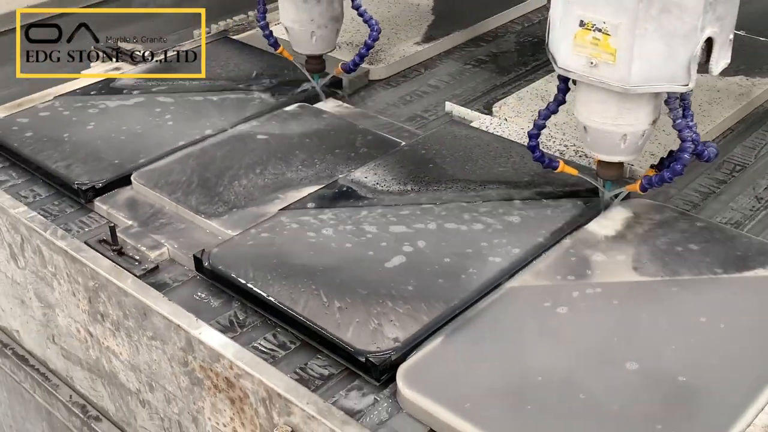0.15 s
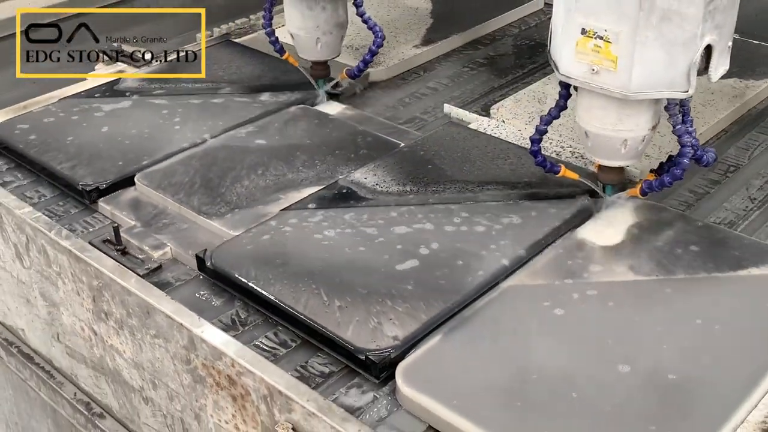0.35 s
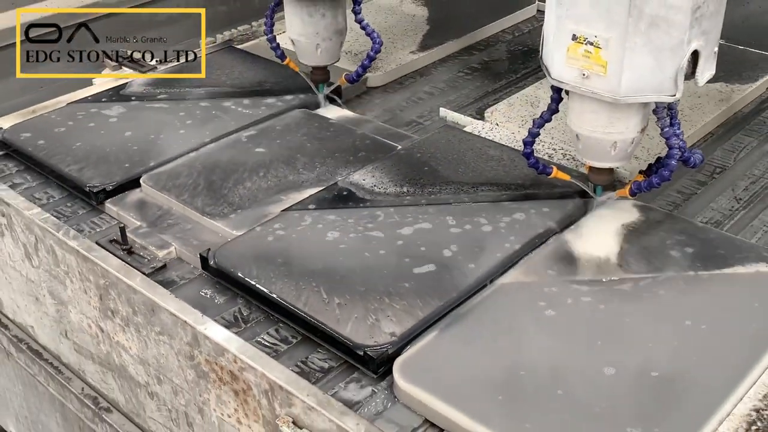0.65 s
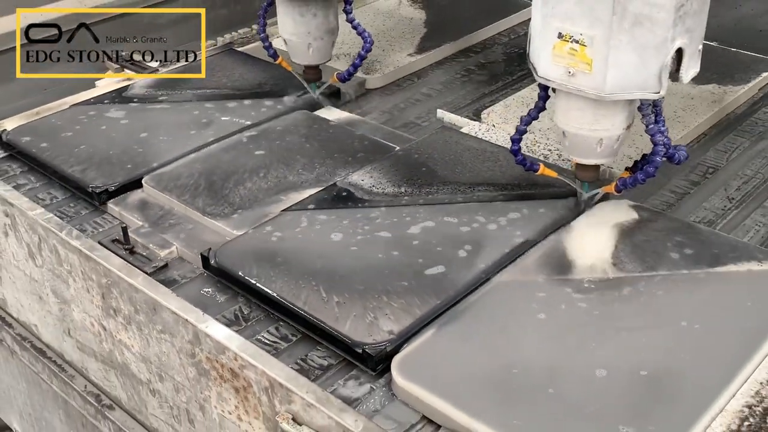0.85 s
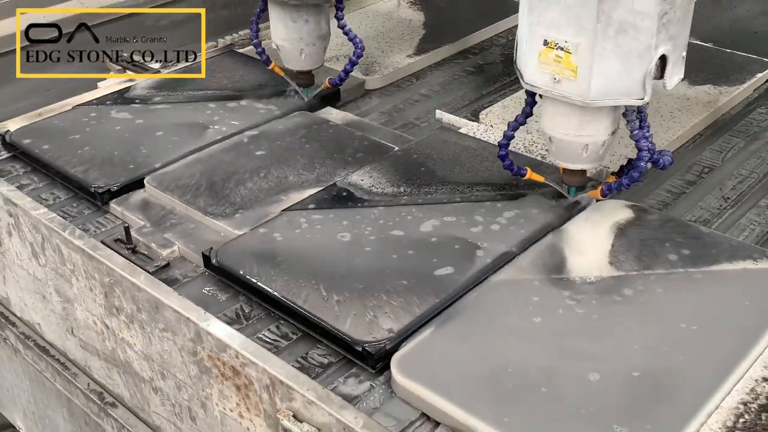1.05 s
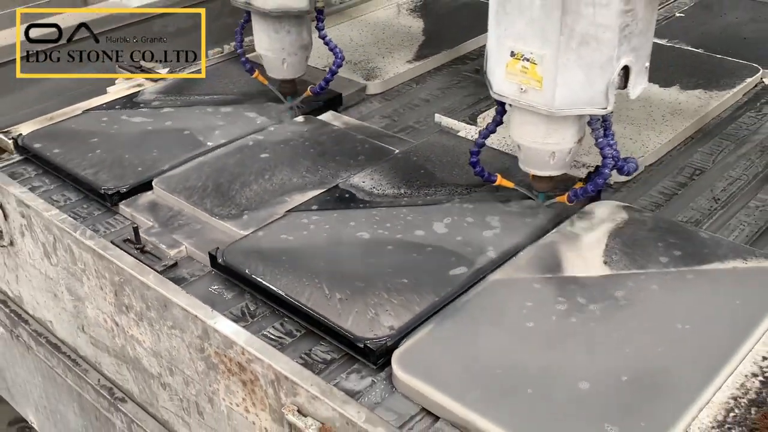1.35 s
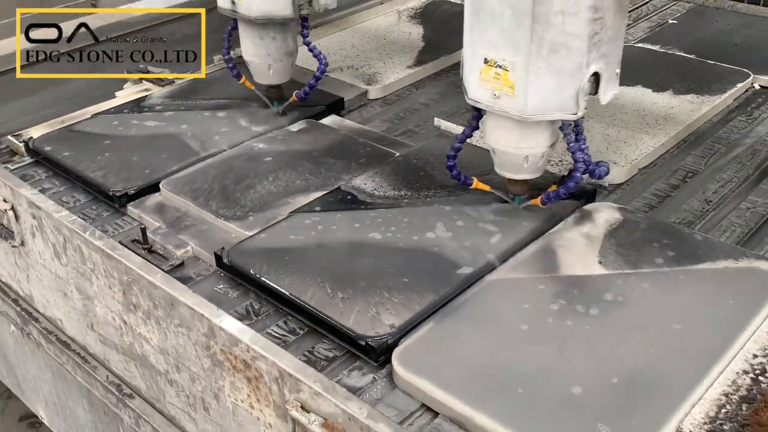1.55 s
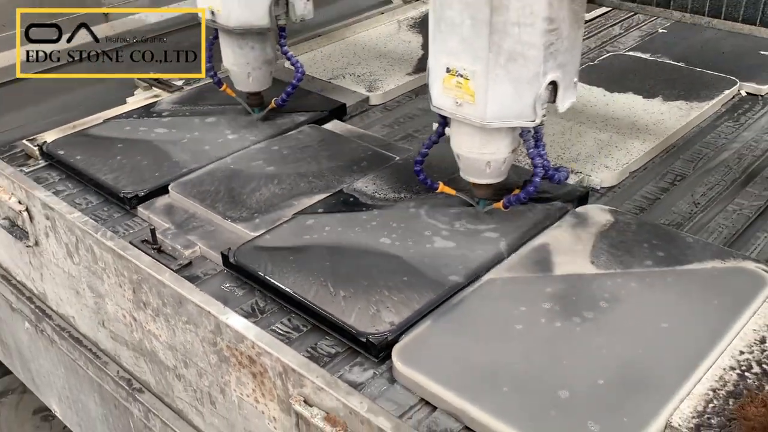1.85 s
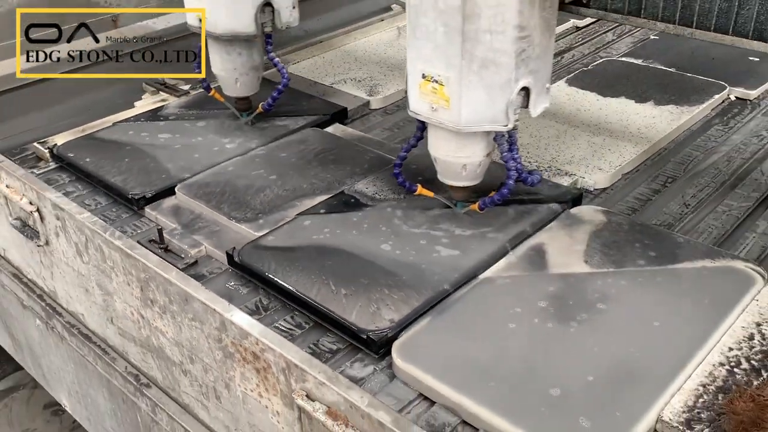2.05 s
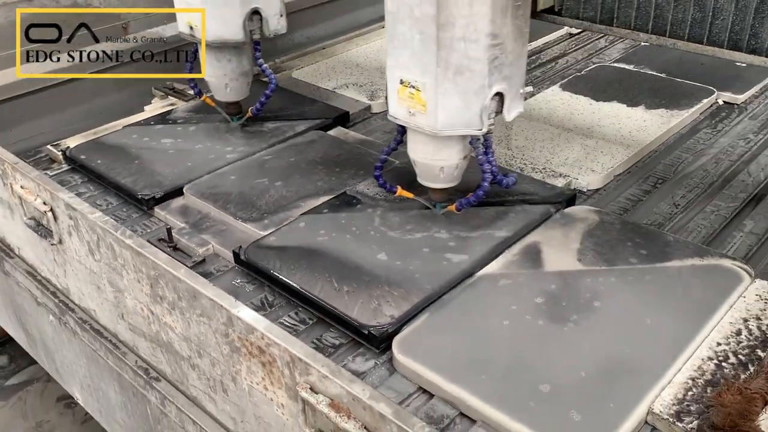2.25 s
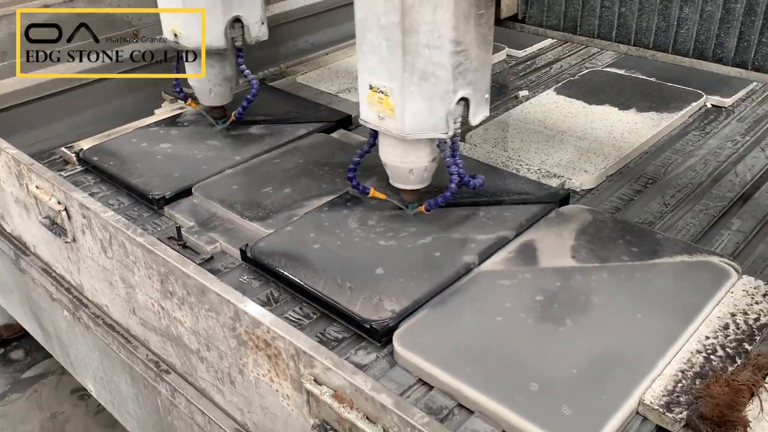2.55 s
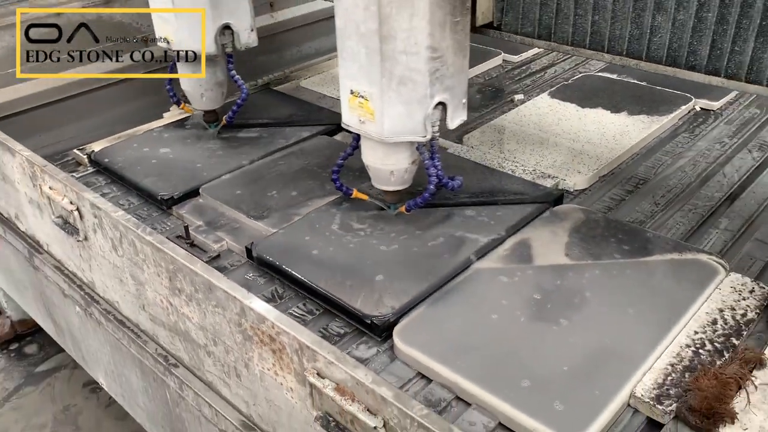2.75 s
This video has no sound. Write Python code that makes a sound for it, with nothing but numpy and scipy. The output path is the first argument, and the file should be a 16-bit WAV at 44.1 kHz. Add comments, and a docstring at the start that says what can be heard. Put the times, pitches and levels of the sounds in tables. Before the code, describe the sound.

Spinning stone grinder skims, lifts briefly, then settles into a steady droning whine with wet hiss

```python
"""A stone router grinds the edge of a wet slab in a rumbling workshop, heard by two close microphones.
At first the tool skims and chatters: its spindle, at about 400 turns a second, drives a whine of many tones.
Then it lifts off and runs free for a moment, with brief squeals as thin tones and tiny ticks as falling chirps.
Last it bites: water splashes louder, the speed sags a little, the whine steadies and the hiss brightens.
Splash, hiss and rumble are coloured noise; the hiss pulses with every turn."""
import sys
import numpy as np
from scipy import signal
from scipy.fft import rfft, irfft
from scipy.io import wavfile

SR = 44100
rng = np.random.default_rng(int(sys.argv[2]) if len(sys.argv) > 2 else 0)


def pcm_store(signal):
    """Save signal as 16-bit PCM."""
    levels = np.round(np.clip(np.atleast_2d(signal), -1, 1) * 32767)
    wavfile.write(sys.argv[1], SR, levels.astype(np.int16).T)


N = 127449
T = np.arange(N) / SR  # time of every sample, s
HZ = np.fft.rfftfreq(N, 1 / SR)  # frequencies of a spectrum
# half of a left-right difference for each side: left, right [factor]
SIDES = np.array([[.5], [-.5]])


def amp(db):
    """Turns decibels into a gain."""
    return 10 ** (np.asarray(db) / 20)


def curve(points):
    """Joins (time, value) points by straight lines, giving a value at every sample."""
    return np.interp(T, *np.transpose(points))


def read(points):
    """Joins (frequency, value) points along a logarithmic pitch scale."""
    hz, value = np.transpose(points)
    return np.interp(np.log(HZ + 1), np.log(hz), value)


def bell(centre, width):
    """A smooth swell from 0 to 1 and back."""
    return np.exp(-((T - centre) / width) ** 2)


def wander(rate_hz, size=2048):
    """Smooth random complex wandering of average power 1, mostly slower than the given rate."""
    span = 2 * T[-1]  # twice the scene, so the repeating pattern does not return
    f = np.fft.fftfreq(size, span / size)
    draws = rng.standard_normal(size) + 1j * rng.standard_normal(size)
    z = np.fft.ifft(draws / (1 + (f / rate_hz) ** 2))
    return np.interp(T, np.linspace(0, span, size), z / np.sqrt(np.mean(abs(z) ** 2)))


def by_load(load, skimming, biting):
    """Blends a skimming value (load 0) into a biting one (load 1)."""
    return skimming + (biting - skimming) * load


# how far the left microphone's wave is ahead: (frequency [Hz], lead [radians])
LEFT_LEAD = [(0, 0), (3800, 6.3), (8000, 17.2), (10200, 12.6), (15000, 3.1)]


def lead(hz):
    """Phase lead of the left microphone at a given pitch, in radians."""
    return np.interp(hz, *np.transpose(LEFT_LEAD))


# how alike the noise is at the two microphones: (frequency [Hz], likeness [0-1])
LIKENESS = [(60, 0.97), (300, 0.99), (800, 0.86), (2000, 0.67), (3300, 0.057), (5500, 0.17), (8500, 0.5),
            (14000, 1)]


def noise(spectrum):
    """Coloured noise at two microphones: they share part of it, and the left one leads."""
    shared, separate = rfft(rng.standard_normal((2, N)))
    same = read(LIKENESS)
    left = shared * np.exp(1j * lead(HZ))
    right = same * shared + np.sqrt(1 - same ** 2) * separate
    return irfft(np.array([left, right]) * amp(read(spectrum)) * np.sqrt(SR / 2), N)


# colour of the workshop rumble, before its level curve: (frequency [Hz], density [dB per Hz])
SHOP_COLOUR = [(25, -88), (36, -73), (52, -59), (82, -59.5), (130, -64.5), (300, -69.5), (700, -83.5),
               (2400, -73), (3300, -79.5), (5000, -75.5), (15500, -87)]
# rise and fall of the rumble: (time [s], level [dB])
SHOP_LEVEL = [(.6, -2), (.8, 1.5), (1.4, 1), (2.0, -2.5)]


def workshop():
    """The rumble of the workshop: steady coloured noise with a slow level curve."""
    return noise(SHOP_COLOUR) * amp(curve(SHOP_LEVEL))


# colour of the splashing, before its level curve: (frequency [Hz], density [dB per Hz])
SPLASH_COLOUR = [(40, -93), (110, -66.5), (200, -64), (480, -62.5), (780, -66), (940, -80), (1300, -63),
                 (1900, -67), (3000, -77), (6000, -81)]
# rise and fall of the splashing: (time [s], level [dB])
SPLASH_LEVEL = [(0, -6.5), (.6, -10), (.9, -10), (1.05, 1), (1.35, -1.5), (2.89, -1)]


def water(flicker_db=3.0):
    """Cooling water splashing over the slab: coloured noise whose level flickers at random."""
    flicker = flicker_db * wander(rate_hz=16).real
    return noise(SPLASH_COLOUR) * amp(curve(SPLASH_LEVEL) + flicker)


# first and last points of the run of ticks: (time [s], pitch at the middle [Hz], level [dB])
TICKS = [(.453, 8950, -42), (1.01, 9700, -35)]
TICK_GAP_S, TICK_S, TICK_FALL_HZ_PER_S = .0458, .0025, 50000


def ticks():
    """Evenly spaced tiny chirps: each falls in pitch while swelling and fading."""
    times, pitches, levels = np.transpose(TICKS)
    out = np.zeros((2, N))
    for at in np.arange(times[0], times[-1], TICK_GAP_S):
        t = T - at
        hz = np.interp(at, times, pitches)
        cycles = hz * t - TICK_FALL_HZ_PER_S * t ** 2 / 2
        chirp = np.sin(2 * np.pi * cycles + SIDES * lead(hz))
        swell = np.exp(-(t / TICK_S) ** 2 / 2)
        out += amp(np.interp(at, times, levels)) * swell * chirp
    return out


# short squeals: (start [s], length [s], pitch [Hz], level [dB])
SQUEALS = [(0.427, 0.02, 3980, -34), (0.454, .2, 10160, -50), (0.663, .007, 5800, -29.5)]


def squeals():
    """Brief thin tones as the tool lifts off, runs free and touches down; each swells and fades."""
    out = np.zeros((2, N))
    for start, length, hz, db in SQUEALS:
        progress = np.clip((T - start) / length, 0, 1)
        swell = np.sqrt(2 * abs(np.sin(np.pi * progress)))
        out += amp(db) * swell * np.sin(2 * np.pi * hz * T + SIDES * lead(hz))
    return out


FREE_HZ, LOADED_HZ = 399.9, 398.45  # turns a second at load 0 and load 1
SKIM_JITTER_HZ, BITE_JITTER_HZ = 0.695, 0.48  # multiply the random speed wander


def spindle(load):
    """Turns made so far by the spindle: under load it slows and its speed wanders less."""
    jitter = by_load(load, SKIM_JITTER_HZ, BITE_JITTER_HZ) * wander(rate_hz=12.3).real
    return np.cumsum(by_load(load, FREE_HZ, LOADED_HZ) + jitter) / SR


# colours of the hiss while skimming, while biting, and in the flare as the tool digs in,
# before load, contact and pulsing: (frequency [Hz], density [dB per Hz])
SKIM_HISS = [(400, -110), (720, -62.5), (950, -75.5), (1300, -74), (2500, -85), (4500, -76), (7400, -67),
             (8500, -70.5), (10400, -72.5), (11500, -89), (14500, -80.5)]
BITE_HISS = [(700, -92), (1800, -77), (3100, -81), (4200, -71.5), (5000, -74), (6200, -66.5), (8400, -65.3),
             (10400, -64.6), (11500, -68.5), (13000, -71.5), (15500, -74)]
ENTRY_HISS = [(7500, -90), (9800, -62), (11500, -82)]
ENTRY_S, ENTRY_WIDTH_S = 1.39, 0.23  # when the flare peaks, and its width
PER_TURN, GRIT_DB = 0.15, 2.5  # depth of the pulse each turn; size of the random roughness


def grinding(turns, load, contact):
    """Grit and flung water hiss: noise pulsing with every turn, brighter under load."""
    hiss = np.sqrt(1 - load) * noise(SKIM_HISS)
    hiss += np.sqrt(load) * noise(BITE_HISS)
    hiss += bell(ENTRY_S, ENTRY_WIDTH_S) * noise(ENTRY_HISS)
    pulse = 1 + PER_TURN * np.cos(2 * np.pi * turns)
    roughness = amp(GRIT_DB * wander(rate_hz=20).real)
    return hiss * contact * pulse * roughness


# tones from the sixth multiple of the turning speed upward, at load 0 and load 1,
# before swells and contact: level [dB], one per multiple
SKIM_DB = [-48, -43, -51, -53, -51, -48, -51, -51, -48, -42.5, -42.5, -48, -45, -42, -48]
BITE_DB = [-45, -47, -51, -49, -47, -44, -46.5, -50, -43.5, -45, -46, -42, -42, -42.5, -41, -50, -48, -42.5,
           -46, -42, -37.5, -43, -45, -54, -54, -54, -54, -45, -47, -45]
SKIM_TOP_DB = -59.5  # each tone above the end of the skimming list
# slow swells of single tones as the tool moves past:
# (multiple of turning speed, centre time [s], width [s], gain [dB])
SWELLS = [(6, 2.55, .3, 8), (7, 2.2, .55, 10), (8, 2.7, .45, 9), (9, 2.85, .55, 10), (10, 2.55, .17, 6),
          (11, 1.87, .3, 8), (14, 2.05, .25, 7), (15, 1.7, .22, 7), (16, 1.15, .14, 6), (17, 2.75, .2, 7)]
CHATTER_HZ, DRIFT_HZ = 24, 2.5  # how fast the flutter and the slow drift wander
SKIM_CHATTER, BITE_CHATTER, DRIFT = 1, 0.45, 0.5  # depths


def whine(turns, load, contact):
    """Upper tones of the rubbing tool: they flutter with chatter and swell as tool and microphones move."""
    out = np.zeros((2, N))
    chatter = by_load(load, SKIM_CHATTER, BITE_CHATTER)
    skim_levels = SKIM_DB + [SKIM_TOP_DB] * len(BITE_DB)
    for k, (skim, bite) in enumerate(zip(skim_levels, BITE_DB), start=6):
        swell_db = sum(db * bell(at, width) for multiple, at, width, db in SWELLS if multiple == k)
        direct = np.exp(1j * SIDES * lead(k * LOADED_HZ))
        # each microphone drifts on its own
        paths = direct + DRIFT * np.array([wander(DRIFT_HZ), wander(DRIFT_HZ)])
        flutter = 1 + chatter * wander(CHATTER_HZ)
        tone = np.exp(2j * np.pi * (k * turns + rng.random())) * flutter
        out += amp(by_load(load, skim, bite) + swell_db) * (paths * tone).real
    # keeps the average power the same whatever the flutter and drift
    return out * contact * np.sqrt(2 / (1 + chatter ** 2) / (1 + DRIFT ** 2))


# the five lowest tones, at one to five times the turning speed: (time [s], level [dB])
TONE_1 = [(0.02, -35), (0.17, -29), (0.3, -43), (0.37, -30.5), (0.46, -35), (0.55, -31.5), (1.19, -32.5),
          (1.26, -43), (1.42, -29), (2.04, -30), (2.18, -26.5), (2.62, -25), (2.88, -27.9)]
TONE_2 = [(.02, -28), (.07, -35), (.11, -26), (.2, -42), (.3, -40), (.34, -28), (.39, -37), (.43, -26),
          (.47, -39), (.66, -40), (.69, -28.5), (.725, -41), (.77, -27), (.86, -23), (.97, -40),
          (1.09, -30), (1.15, -38), (1.24, -23), (1.43, -21.5), (1.8, -26.5), (2.27, -26), (2.62, -21.7),
          (2.88, -26.5)]
TONE_3 = [(0, -32.5), (.06, -31), (.17, -44), (.29, -43), (.355, -32), (.4, -43), (1.05, -43), (1.15, -29),
          (1.23, -40), (1.7, -49), (2.89, -43)]
TONE_4 = [(.33, -41), (.5, -62), (.9, -49), (1.17, -37), (1.42, -48), (1.85, -37), (2.42, -35.5),
          (2.89, -45)]
TONE_5 = [(.02, -34.5), (.13, -53), (.21, -37), (.3, -54), (.38, -39.5), (.5, -62), (.72, -45), (1.25, -46),
          (1.34, -36.5), (1.55, -43), (1.75, -34), (2.04, -30), (2.63, -39), (2.88, -33)]
# where each of the five sits between the moving microphones, one list per tone:
# (time [s], left lead [turns of its own wave])
TONE_LEADS = [
    [(.27, .66), (.38, 0.95), (.46, 0.59), (.9, 0.64), (1.4, 0.045), (2.2, 0.11)],
    [(.8, 0.058), (1.2, 0.13)],
    [(0, 0.14)],
    [(1.7, -0.19), (2.2, -0.83), (2.7, -0.36)],
    [(1.1, -0.24), (1.28, 0.27), (1.52, -0.23), (1.72, 0.34), (2.5, 0.67)],
]
# loudness difference of each of the five: left minus right [dB]
TONE_PANS = [1.8, -2.3, 1.5, -2.5, -3.5]
LOW_SKIM_CHATTER, LOW_BITE_CHATTER = .38, .14  # flutter depths at load 0 and load 1


def drone(turns, load):
    """The strong lowest tones, rung in the slab once a turn; their flutter calms under load."""
    out = np.zeros((2, N))
    chatter = by_load(load, LOW_SKIM_CHATTER, LOW_BITE_CHATTER)
    levels = [TONE_1, TONE_2, TONE_3, TONE_4, TONE_5]
    for k, (level, left_lead, pan_db) in enumerate(zip(levels, TONE_LEADS, TONE_PANS), start=1):
        phase = k * turns + rng.random() + SIDES * curve(left_lead)
        flutter = 1 + chatter * wander(CHATTER_HZ)
        tone = np.sqrt(2) * (np.exp(2j * np.pi * phase) * flutter).real
        out += amp(curve(level) + SIDES * pan_db) * tone
    return out / np.sqrt(1 + chatter ** 2)  # keeps the average power the same


# how hard the tool bites: (time [s], load [0-1])
LOAD = [(.9, 0.02), (1.17, 0.16), (1.27, 0.76), (1.36, 0.87)]
# strength of the rubbing contact, for the upper tones and the hiss: (time [s], level [dB])
CONTACT = [(0, 3.5), (.1, 1.5), (.22, -1), (.26, 0), (.33, 3.5), (.40, -2), (.438, 0), (.455, -11.5),
           (.65, -11), (.668, -2), (.705, 3), (.73, -6.5), (.77, 0.5), (.97, -0.5), (1.04, 3), (1.18, 2),
           (1.32, 0), (2.89, 0.5)]


def scene():
    """The cutting tool over the rumble of the workshop, all driven by one load and one spindle."""
    load, contact = curve(LOAD), amp(curve(CONTACT))
    turns = spindle(load)
    background = workshop() + water()
    tool = grinding(turns, load, contact) + whine(turns, load, contact) + drone(turns, load)
    return background + ticks() + squeals() + tool


EDGE_HZ = 15720  # upper limit of the sound


def record(dry):
    """The band limit of the recorder: a steep filter removes the sound above the edge."""
    low_pass = signal.firwin(1023, EDGE_HZ, window=("kaiser", 9), fs=SR)
    return signal.oaconvolve(dry, low_pass[None], "same")


dry = scene()
out = record(dry)
pcm_store(out)
```